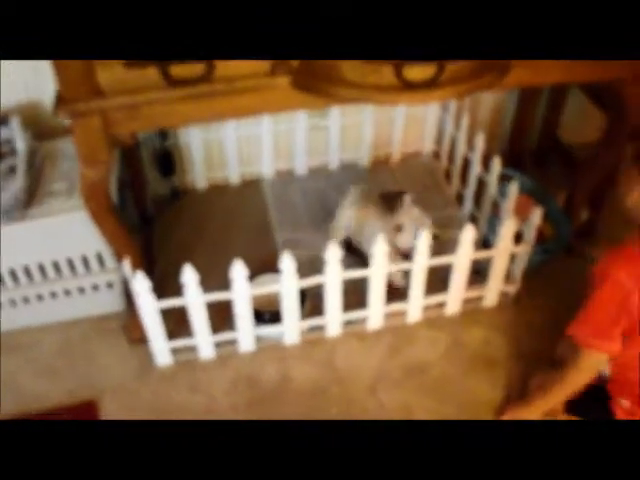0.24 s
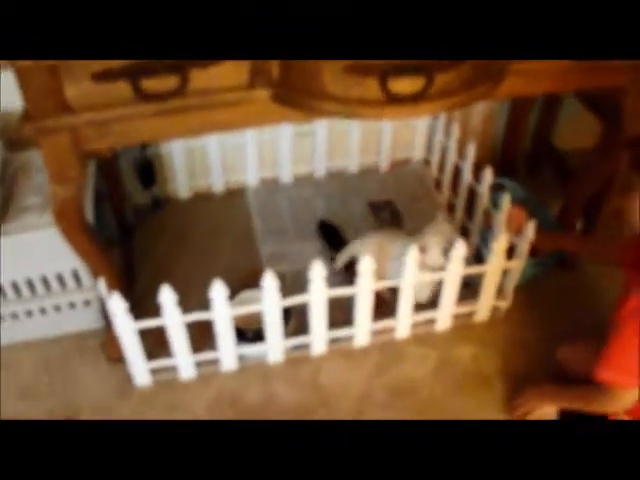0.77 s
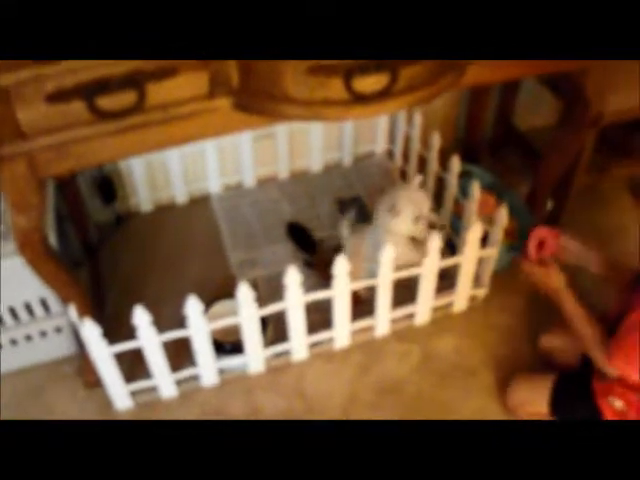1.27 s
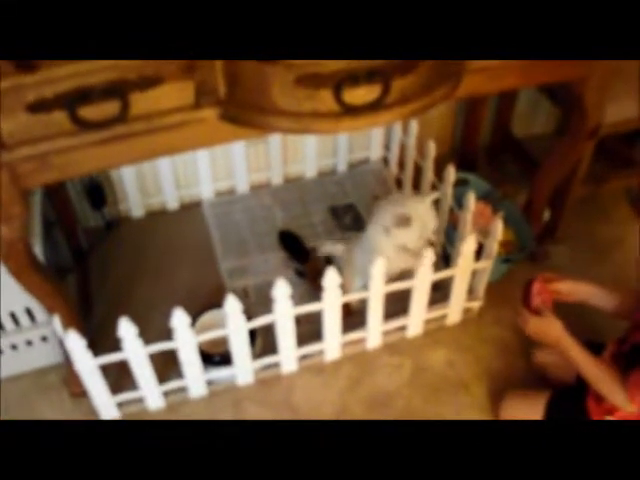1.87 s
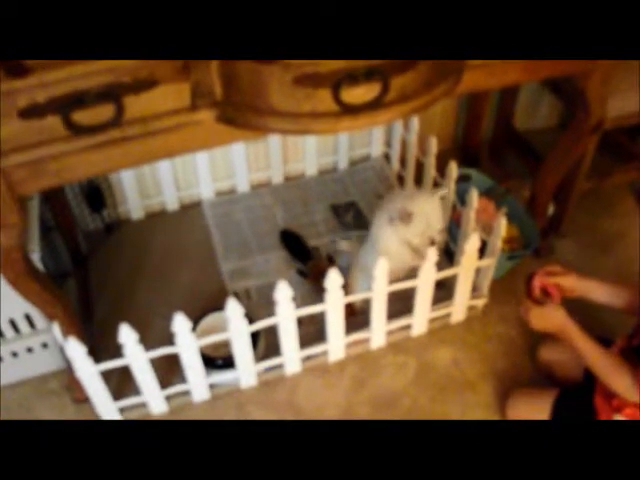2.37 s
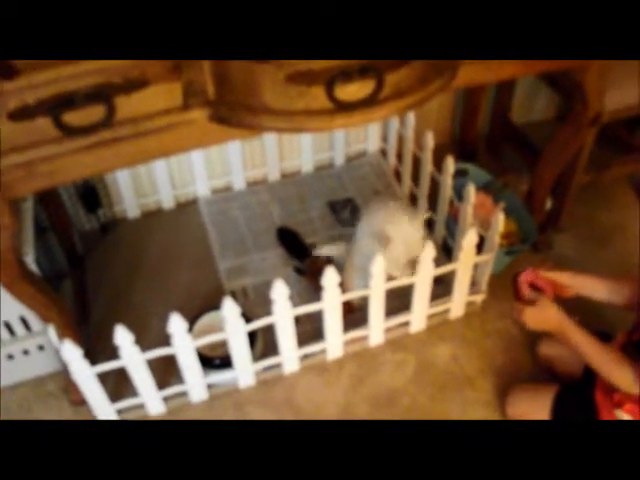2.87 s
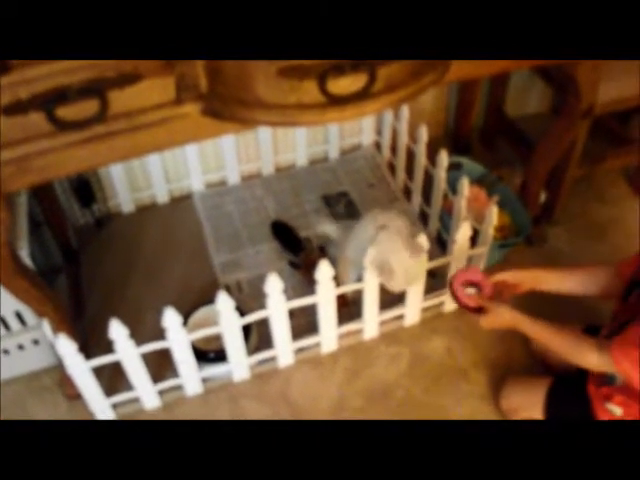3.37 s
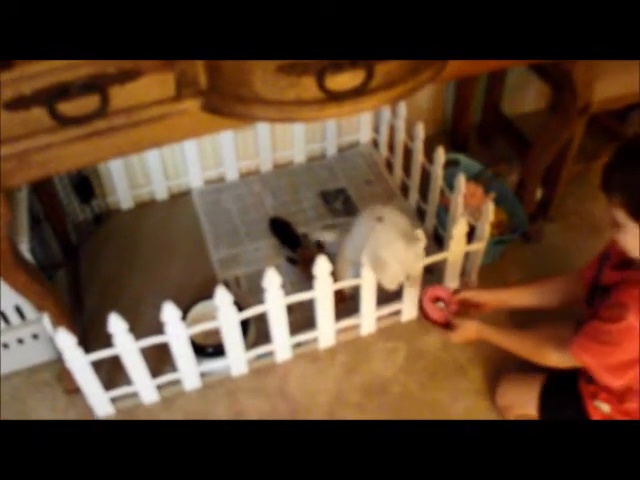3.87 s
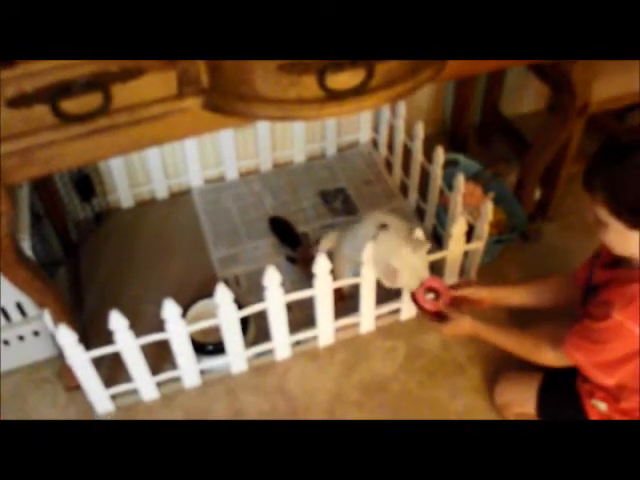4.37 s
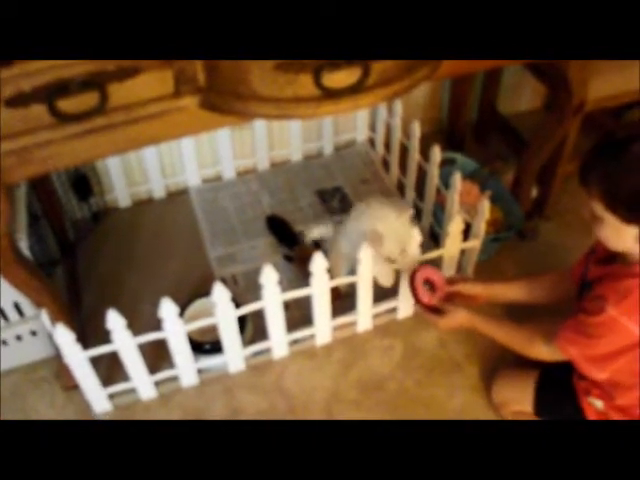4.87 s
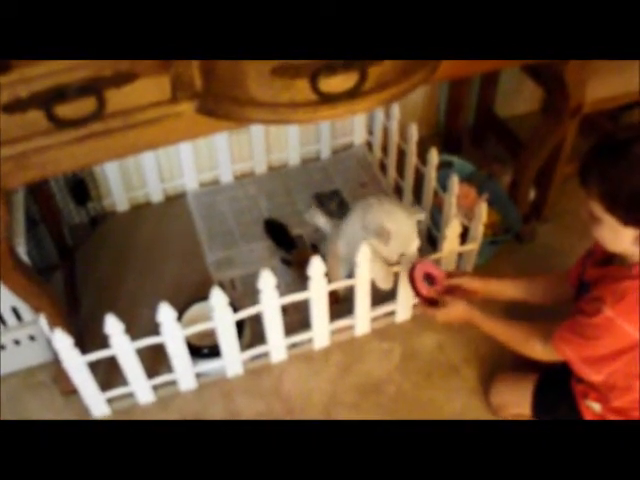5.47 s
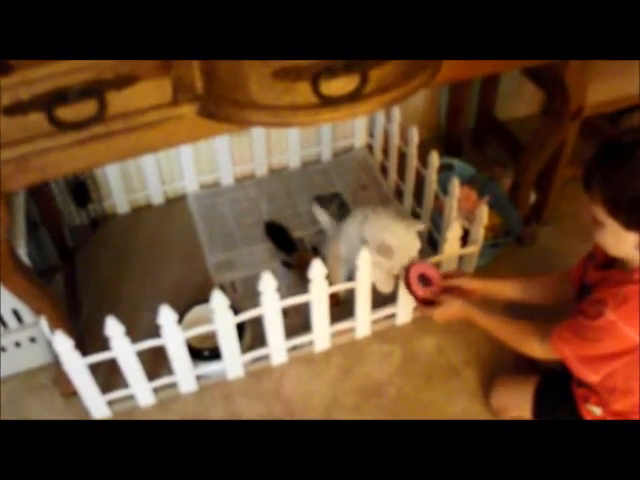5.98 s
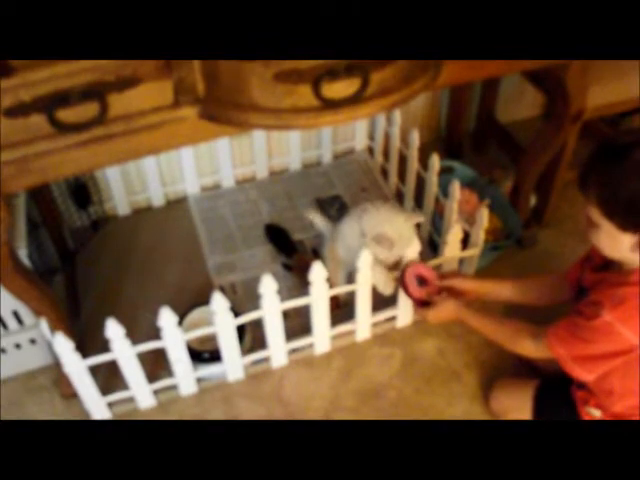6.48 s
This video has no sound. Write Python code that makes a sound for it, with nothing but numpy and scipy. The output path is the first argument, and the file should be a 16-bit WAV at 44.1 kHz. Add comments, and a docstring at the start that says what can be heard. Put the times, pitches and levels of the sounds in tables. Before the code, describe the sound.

In a tiled living room, a puppy's faint paw scrapes and light knocks on a plastic fence follow a close button click. Then a rubber toy, about two metres from the microphone, is squeezed again and again, giving short, shrill squeaks that alternate between a higher and a lower pitch and come more often in the second half. Each sound rings briefly in the room, and a steady hiss lies underneath.

```python
"""Tiled living room: a rubber toy is squeezed two metres from a small camera with one microphone.
Its reed squeaks high as air is pushed out, lower as air is sucked back; fingers thump the rubber.
A puppy shuffles in its pen and knocks the plastic fence. The room rings briefly after each sound.
The camera's button clicks at the start; a steady hiss lies underneath."""
import sys
import numpy as np
from scipy import signal
from scipy.fft import rfft, irfft, next_fast_len
from scipy.io import wavfile

SR = 44100
rng = np.random.default_rng(int(sys.argv[2]) if len(sys.argv) > 2 else 0)


def put_to_file(sound):
    """Save the sound as 16-bit audio at rate SR, in the file named by the first command-line argument."""
    columns = np.atleast_2d(sound).T  # one column per channel
    safe = np.clip(columns, -1, 1)
    whole_steps = np.round(safe * 32767)
    wavfile.write(sys.argv[1], SR, whole_steps.astype(np.int16))


N = 297057
T = np.arange(N) / SR


def amp(db):
    return 10 ** (np.asarray(db) / 20)


def at_hz(table, hz):
    """Table lookup on a log frequency axis."""
    knots_hz, values = np.transpose(table)
    return np.interp(np.log(np.maximum(hz, 1)), np.log(knots_hz), values)


def unit_rms(x):
    return x / np.sqrt(np.mean(x ** 2))


def band(x, lo_hz, hi_hz):
    return signal.sosfilt(signal.butter(2, [lo_hz, hi_hz], "bandpass", fs=SR, output="sos"), x)


def band_noise(size, lo_hz, hi_hz):
    return unit_rms(band(rng.standard_normal(size), lo_hz, hi_hz))


def drift(rate_hz, size):
    """Random values joined by straight lines."""
    knots = rng.standard_normal(int(size * rate_hz / SR) + 2)
    return np.interp(np.arange(size) * rate_hz / SR, np.arange(len(knots)), knots)


def add(out, start_s, x):
    i = int(start_s * SR)
    out[i:i + len(x)] += x[:len(out) - i]


def strike(out, modes, blows, contact_s=1 / SR):
    """Add the ring of damped modes for each blow."""
    t = T[:SR // 8]
    ring = sum(amp(db) * np.sin(2 * np.pi * hz * t) * amp(-60 * t / t60_s) for hz, db, t60_s in modes)
    for start_s, level_db in blows:
        add(out, start_s, amp(level_db) * np.minimum(t / contact_s, 1) * ring)


def reed(stroke, colour, attack_s, rise_power, drop_power, fade_power,
         swell_db, fade_db, flutter, waver_db, air_db, spit_db):
    """The reed chops the air stream into a stack of harmonics, with rushing air between them."""
    _, length_s, peak_hz, crest, rise_hz, sag_hz, drop_hz, *levels_db, grip_db = stroke
    t = np.arange(0, length_s, 1 / SR)
    size = len(t)
    # Pressure builds to the crest, then drains.
    before = np.clip(1 - t / (crest * length_s), 0, 1)
    after = np.clip((t / length_s - crest) / (1 - crest), 0, 1)
    fundamental, mid, treble, top = (amp(db + swell * before + fade * after ** fade_power)
                                     for db, swell, fade in zip(levels_db, swell_db, fade_db))
    fundamental *= amp(0.77 * waver_db * drift(51.8, size))
    pitch_hz = peak_hz - rise_hz * before ** rise_power - sag_hz * after - drop_hz * after ** drop_power
    slack = 1 - pitch_hz / peak_hz  # less steady as pressure and pitch fall
    pitch_hz *= 1 + flutter * (1 + 14 * slack) * drift(401, size)
    phase = 2 * np.pi * np.cumsum(pitch_hz) / SR

    harmonics = np.arange(2, 22)[:, None]
    overtone_hz = harmonics * pitch_hz
    shade_db = np.pad(grip_db, (0, len(harmonics) - len(grip_db)))[:, None]
    shade_db = shade_db + waver_db * np.array([drift(70, size) for _ in harmonics])
    gain = amp(at_hz(colour, overtone_hz) + shade_db) * (overtone_hz < 17000)
    above_mid, above_treble = (1 / (1 + np.exp((edge_hz - overtone_hz) / 100))
                               for edge_hz in (5500, 9550))
    shares = (1 - above_mid, above_mid - above_treble, above_treble)
    gain *= sum(share * level / np.sqrt(np.sum((gain * share) ** 2, axis=0))
                for share, level in zip(shares, (mid, treble, top)))
    scatter_rad = 0.77 * rng.standard_normal(harmonics.shape)  # nearly in step: one pulse a cycle
    overtones = np.sqrt(2) * np.sum(gain * np.cos(harmonics * phase + scatter_rad), axis=0)

    air = treble * amp(-12) * band_noise(size, 6900, 9300)
    air += mid * band_noise(size, 1630, 4300)
    air += top * band_noise(size, 8100, 15000)
    spit_decay = np.exp(-np.maximum(t - attack_s, 0) / 0.0014)
    spit = treble * amp(spit_db) * spit_decay * band_noise(size, 5800, 9700)
    onset = np.minimum(t / attack_s, 1)
    catch = onset ** 4.5  # overtones and air set in late and sharply
    close = np.clip((length_s - t) / 0.0033, 0, 1)
    tone = np.sqrt(2) * fundamental * np.sin(phase)
    return close * (onset * tone + catch * (overtones + amp(air_db) * air + spit))


def toy():
    """Squeezes are steady; the reed wobbles more on air drawn back. Fingers thump the hollow rubber."""
    # start_s, length_s, peak_hz, crest_fraction, rise_hz, sag_hz, drop_hz,
    # fundamental_db, mid_db, treble_db, top_db, grip_db (harmonics 2-7)
    squeezes = [ (2.526, .074, 1260, 0.33, 21, 30, 115, -25.5, -16, -28.5, -35, (6, -6, 17, -5, 9, 8)),
                (3.714, 0.095, 1302, 0.41, 42, 21.6, 132, -20, -20, -15.5, -34.5, (6, 1.5, 5, -2, 5.5, -4)),
                (4.524, 0.077, 1257, 0.14, 24, 37.4, 101, -22.5, -21.5, -17, -38.5, (0.5, 2.5, 1.5, -10.5, 4, -1)),
                (4.864, 0.11, 1258, 0.42, 22.6, 17, 128, -22.5, -22.5, -18, -32, (-1.5, -1, 5, -3.5, 8, 5)),
                (5.368, 0.087, 1297, 0.34, 38, 80, 83, -23, -24, -15.5, -36, (1.5, -1.5, 6.5, -6.5, 7, 2.5)),
                (5.65, .112, 1268, 0.13, 19, 51, 59.6, -22.5, -20.5, -17, -32.5, (5, 0, 10.5, -7.5, 3.5, 4)),
                (6.403, 0.073, 1305, 0.4, 51, 38, 126, -22, -23, -14, -35.5, (3, 0.5, 9.5, -7, 4.5, -1)),
                (6.7, 0.08, 1276, 0.28, 13, 37, 120, -21.5, -22, -14.5, -34, (0, 6, 10, -4, 6, 0)), ]
    releases = [ (2.358, 0.11, 890.7, .33, 71, 41, 176, -29.5, -19.5, -26, -36.5, (2.5, 1.5, 3, 7, -3, 9)),
                (2.655, .13, 933.5, 0.36, 108.7, 135, 99.2, -28, -20.5, -26.5, -34, (6.5, 0, 4.5, 4, 5, 8)),
                (3.865, .13, 978, 0.27, 115, 159, 99.7, -23.5, -23.5, -19, -38.5, (9.5, 0, 6.5, -1, -6, 1.5)),
                (4.693, .057, 821.4, 0.26, 35.3, 20, 110, -31, -27, -19.5, -39.5, (5, -2, 6.5, -2, -12, -13)),
                (5.02, .12, 941, .3, 95, 114, 111, -23.5, -25, -18.5, -36.5, (7.5, -3, -1, 1.5, -17, -3)),
                (5.501, .085, 876, 0.29, 70, 38.4, 162.5, -26, -28.5, -21.5, -38, (11, -4.5, 0, 6, -8, -9)),
                (5.825, 0.092, 923, .36, 76, 48, 190, -24, -25, -22, -35, (9, -2.5, -1.5, 7, -10, 2)),
                (6.254, .08, 903, 0.31, 55.7, 39, 178.5, -25, -23.5, -18, -38.5, (7, 0, 3, 3, -12, -8)), ]
    # overtone spectra: freq_hz, gain_db
    squeeze_colour = [(2400, 0), (3800, 0), (5000, -19.5), (6300, 12.5), (7600, 5.5), (8900, 1), (10000, 2),
                      (11500, -10.5), (13000, -14), (15500, -10)]
    release_colour = [(1400, -8), (1900, -1), (2700, 13), (3500, 4.5), (4500, -23), (6000, -2), (7400, 21),
                      (8500, 7.5), (10000, -12.5), (12500, -23.5), (15500, -31)]
    # finger blows: start_s, level_db
    thumps = [(5.018, -33.5), (5.184, -40), (5.825, -39.5), (6.413, -45.5)]
    # rubber body: freq_hz, gain_db, t60_s
    rubber_modes = [(209, -5.5, 0.11), (459, -3, 0.092)]
    out = np.zeros(N)
    for stroke in squeezes:
        squeak = reed(stroke, squeeze_colour, attack_s=0.0041,
                      rise_power=1.85, drop_power=4.43, fade_power=1.7,
                      swell_db=(-1, -3, 0.5, -5), fade_db=(-11, -6, -3.5, -12.5),
                      flutter=0.0012, waver_db=3, air_db=-18, spit_db=-11)
        add(out, stroke[0], squeak)
    for stroke in releases:
        squeak = reed(stroke, release_colour, attack_s=0.005,
                      rise_power=2.12, drop_power=2.4, fade_power=2.45,
                      swell_db=(-4, -2.5, -3, -7), fade_db=(-14.5, -11, -10.5, -8),
                      flutter=0.003, waver_db=4.5, air_db=-13, spit_db=-17)
        add(out, stroke[0], squeak)
    strike(out, rubber_modes, thumps)
    rasp_size = int(0.012 * SR)  # the reed rasps once
    add(out, 5.378, amp(-27) * np.hanning(rasp_size) * band_noise(rasp_size, 3600, 5000))
    return out


def puppy(rise_s=0.009, t60_s=0.11):
    """Paws and fur scrape the pen floor; hollow taps and fence knocks ring briefly."""
    # gritty scrapes: start_s, mid_db, treble_db
    shuffles = [(0.1331, -49, -47.5), (0.7404, -54, -61), (0.9337, -51, -52), (1.0898, -39, -53),
                (1.3094, -49, -46), (1.412, -48, -42), (1.477, -63, -44.5), (1.568, -44, -62),
                (1.6594, -35, -49), (1.732, -42, -63), (1.81, -37.5, -51), (2.1358, -33.5, -39.5),
                (2.818, -55, -38), (2.8854, -47.5, -36), (3.03, -34, -40), (4.241, -57, -42),
                (4.365, -27.5, -36.5), (4.3785, -39, -41), (4.495, -30.5, -37.5)]
    # runs of soft taps, knocks on the fence: start_s, level_db
    taps = [(0.797, -43.5), (0.897, -44), (0.992, -42), (1.109, -47), (1.569, -41), (1.673, -44.5),
            (1.765, -43), (1.888, -45), (2.315, -43), (2.503, -40), (4.274, -42.5), (4.368, -44),
            (4.468, -42.5), (4.642, -45), (5.366, -47)]
    knocks = [(0.934, -42), (1.242, -29.5), (1.2497, -33), (1.262, -51), (1.4144, -35), (2.1534, -35),
              (3.042, -38)]
    # hollow tap, plastic fence: freq_hz, gain_db, t60_s
    tap_modes = [(280, 4, .055), (1010, 1, .045), (1800, -8, .015)]
    fence_modes = [(1100, -9, .03), (1960, -3, .045), (2120, -3, .035), (3150, -3, .04), (3380, 0, .045),
                   (3550, -4, .035)]
    out, t = np.zeros(N), T[:SR // 5]
    envelope = np.minimum(t / rise_s, 1) * amp(-60 * t / t60_s)
    for start_s, mid_db, treble_db in shuffles:
        grit = rng.standard_normal((2, len(t))) * amp(1.6 * rng.exponential(1, len(t)))
        mid = amp(mid_db) * unit_rms(band(grit[0], 1950, 3600))
        treble = amp(treble_db) * unit_rms(band(grit[1], 5400, 9900))
        add(out, start_s, (mid + treble) * envelope)
    strike(out, tap_modes, taps)
    strike(out, fence_modes, knocks, contact_s=0.0008)
    return out


def button():
    """The camera's button clicks on press and rebound."""
    # clicks: start_s, level_db
    clicks = [(0.0005, 4.5), (0.0048, -17)]
    # button resonances: freq_hz, gain_db, t60_s
    modes = [(1003, -34, 0.086), (1506, -5.5, 0.035), (1758, 0, 0.023), (2250, -4, 0.011),
             (2900, -13, 0.027), (3555, -6, 0.012), (7560, -21, 0.0086)]
    out = np.zeros(N)
    strike(out, modes, clicks)
    return out


def hiss():
    """Air hiss and distant rustle ring in the camera housing; half-octave bands flicker."""
    # noise spectrum: freq_hz, relative_db
    colour = [(20, -3), (55, 4), (81, -7.5), (119, -5.5), (197, -10.5), (419, -15), (600, -17.5),
              (1210, -16), (2720, -8.5), (4200, -17.5), (5400, -25), (7000, -23), (10000, -30.5),
              (15800, -33)]
    # housing resonances: freq_hz, width_hz, gain_db
    housing = [(1010, 16, 8.5), (1610, 110, 7.5), (1977, 77, 6.5), (2346, 190, 7), (2670, 117, 6),
               (3436, 500, 9), (3830, 100, 9), (4450, 290, 6.5), (5015, 410, 10.5), (8000, 730, 9.5),
               (8100, 30, 4)]
    # 1.5-5.4 kHz level before flicker: time_s, level_db
    levels = [(0, -44), (0.3, -41.5), (1.9, -43.5), (2.2, -41), (3.3, -43), (4.15, -42.5), (4.45, -41),
              (4.8, -42), (5.28, -40), (6.1, -43), (6.74, -43)]
    size = next_fast_len(N)
    hz = np.fft.rfftfreq(size, 1 / SR)
    housing_db = sum(db / (1 + (2 * (hz - mode_hz) / width_hz) ** 2) for mode_hz, width_hz, db in housing)
    spectrum = rfft(rng.standard_normal(size)) * amp(at_hz(colour, hz) + housing_db)
    mid_rms = np.std(irfft(spectrum * (hz > 1500) * (hz < 5400), size))
    rustle_db = 1.32 * drift(45, N)
    half_octaves = 2 * np.log2(hz + 1)
    out = np.zeros(N)
    for centre in range(8, 29):
        share = np.clip(1 - np.abs(half_octaves - centre), 0, 1)
        flicker_db = 1.6 * drift(28, N)
        if 18 < centre < 26:  # middle bands also move together
            flicker_db += rustle_db
        out += irfft(spectrum * share, size)[:N] * amp(flicker_db)
    return out / mid_rms * amp(np.interp(T, *np.transpose(levels)))


def room(x, echo_db=-3.5, gap_s=0.00127):
    """Dense short echoes, strongest in the middle; the top dies first."""
    # echo spectrum: freq_hz, gain_db
    colour = [(500, -4.5), (1300, -1.5), (2800, 2), (7500, -1.5), (14000, -2.5)]
    # echo decay: freq_hz, t60_s
    decay = [(500, 0.2), (2500, 0.22), (8000, 0.22), (15000, 0.15)]
    t, tail = T[:SR // 2], 0
    noise = rng.standard_normal(len(t))
    for lo_hz in 250 * 2 ** np.arange(0, 6, 0.25):
        envelope = amp(at_hz(colour, lo_hz) - 60 * t / at_hz(decay, lo_hz))
        tail += band(noise, lo_hz, lo_hz * 2 ** 0.25) * envelope
    tail *= t > gap_s
    tail /= np.sqrt(np.sum(tail ** 2))
    return x + amp(echo_db) * signal.fftconvolve(x, tail)[:N]


def scene():
    """One microphone feeds both channels; the button is on the camera, so it has no echo."""
    mono = room(toy() + puppy()) + hiss() + button()
    return np.array([mono, mono])


def record(dry, dip_hz=5480, cutoff_hz=15800):
    """Microphone port dip, clipping at full scale, steep low-pass."""
    b, a = signal.iirnotch(dip_hz, Q=14, fs=SR)
    port = 0.8 * signal.lfilter(b, a, dry) + 0.2 * dry
    lowpass = signal.ellip(10, 0.2, 70, cutoff_hz, fs=SR, output="sos")
    return signal.sosfilt(lowpass, np.clip(port, -1, 1))


dry = scene()
out = record(dry)
put_to_file(out)
```